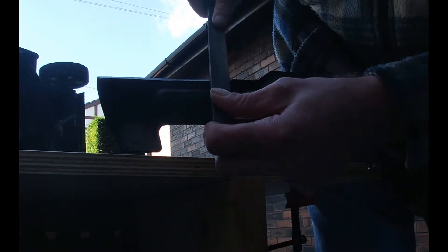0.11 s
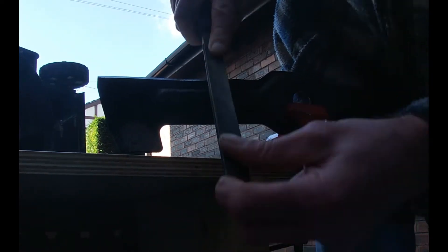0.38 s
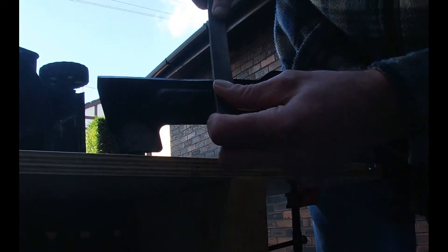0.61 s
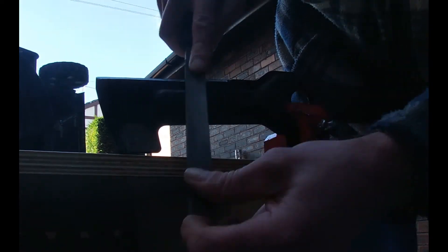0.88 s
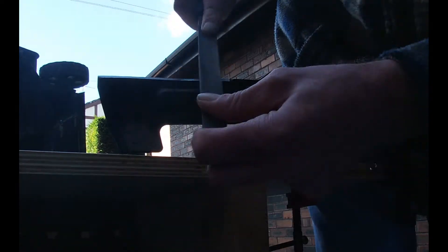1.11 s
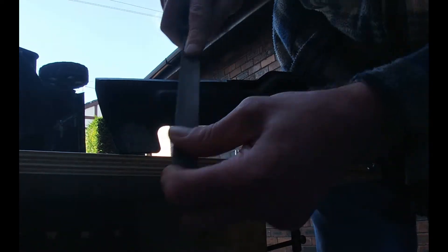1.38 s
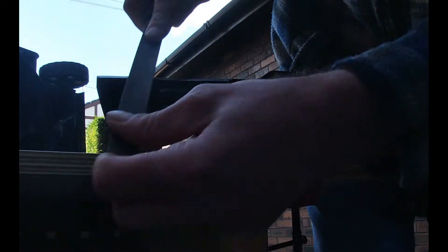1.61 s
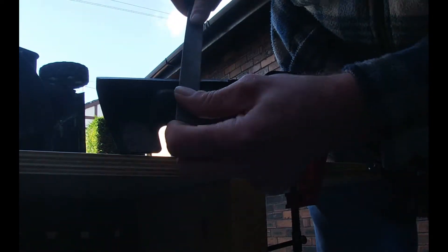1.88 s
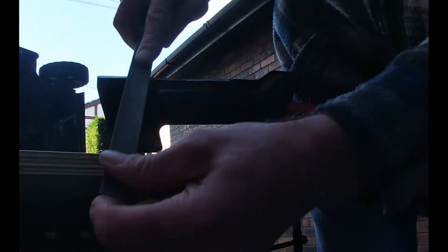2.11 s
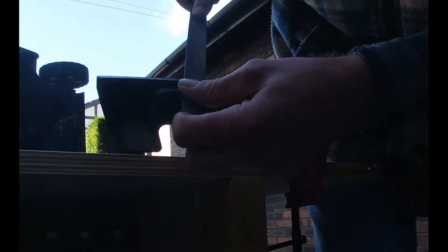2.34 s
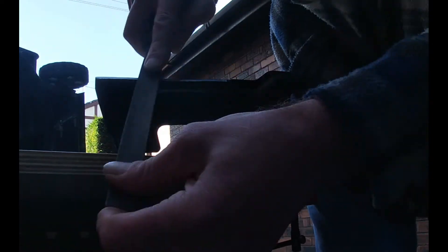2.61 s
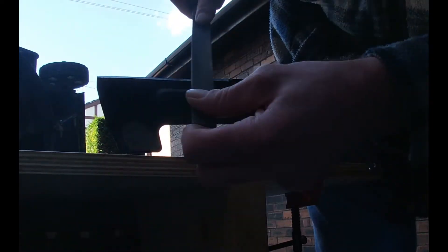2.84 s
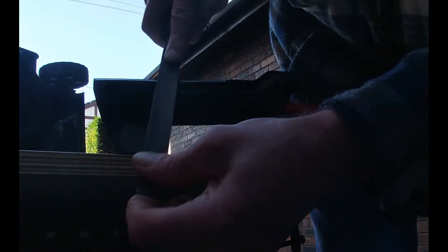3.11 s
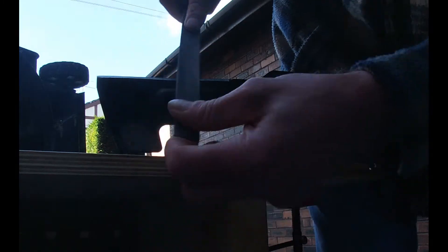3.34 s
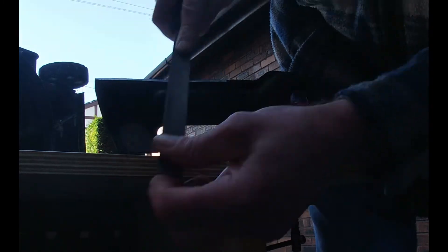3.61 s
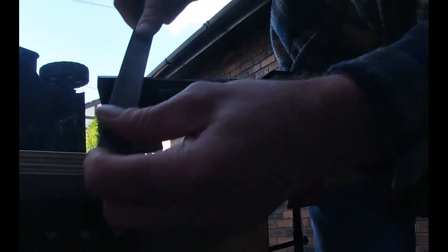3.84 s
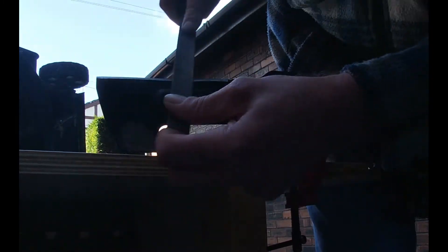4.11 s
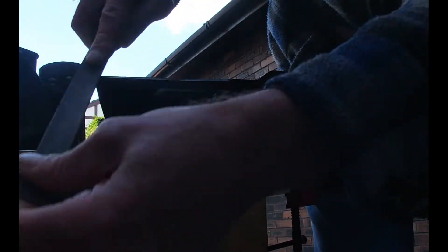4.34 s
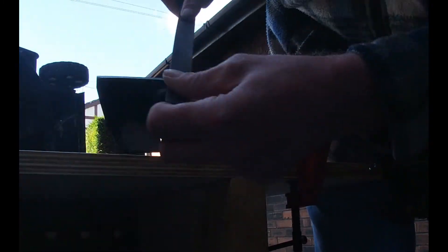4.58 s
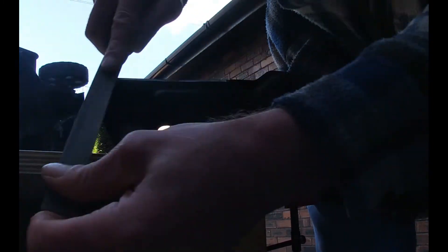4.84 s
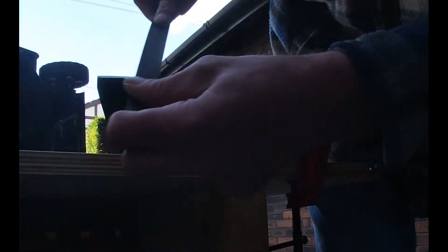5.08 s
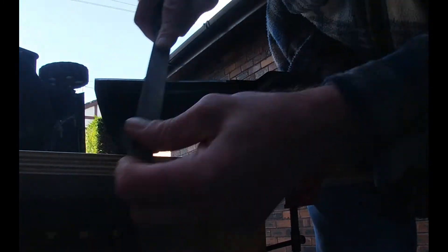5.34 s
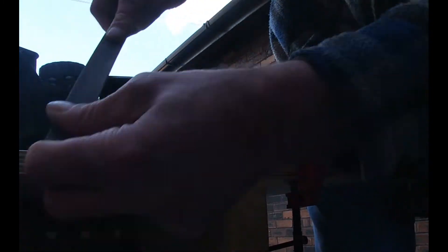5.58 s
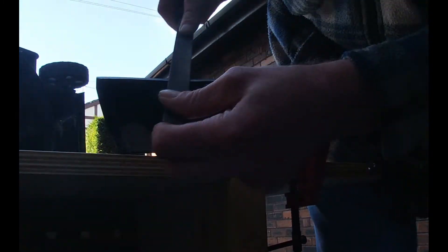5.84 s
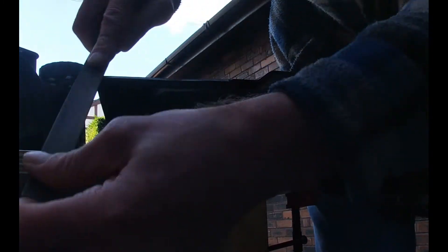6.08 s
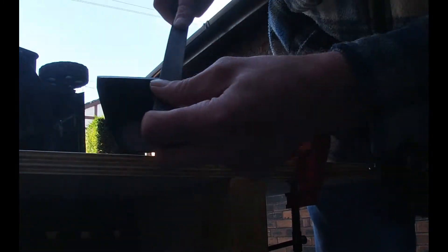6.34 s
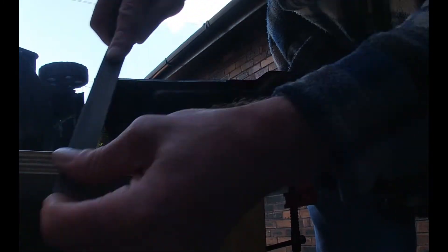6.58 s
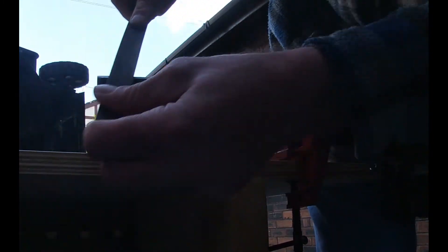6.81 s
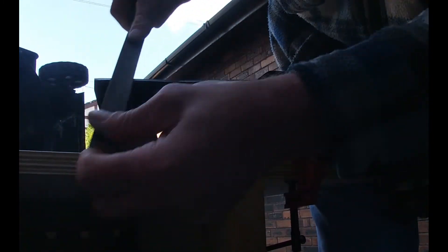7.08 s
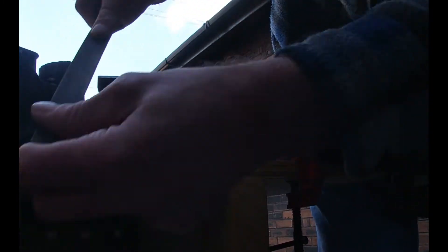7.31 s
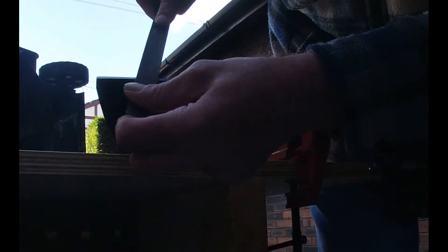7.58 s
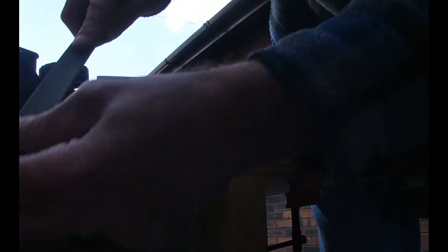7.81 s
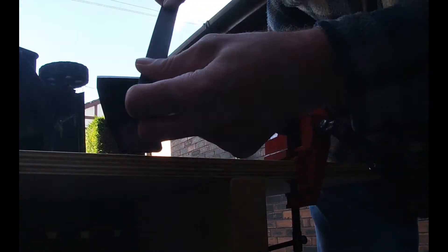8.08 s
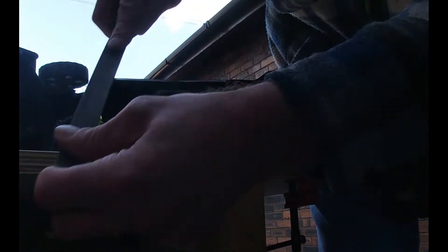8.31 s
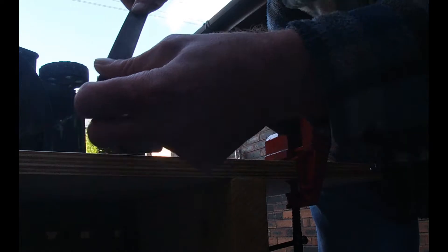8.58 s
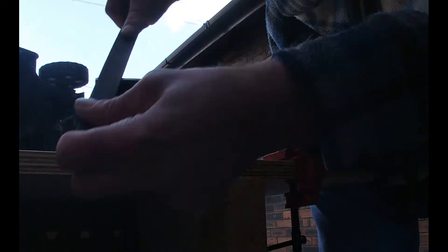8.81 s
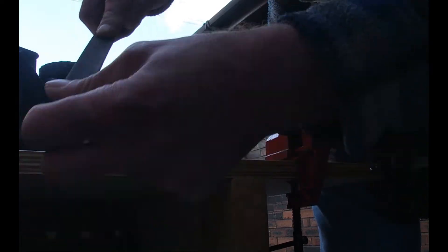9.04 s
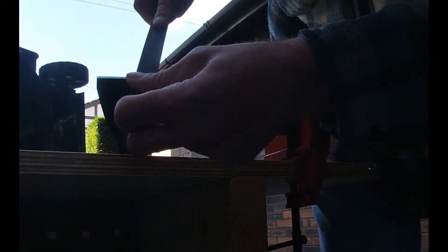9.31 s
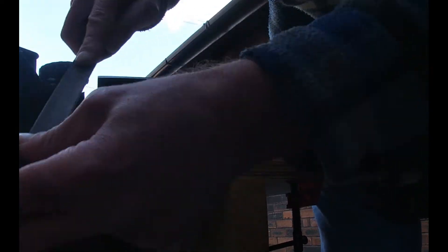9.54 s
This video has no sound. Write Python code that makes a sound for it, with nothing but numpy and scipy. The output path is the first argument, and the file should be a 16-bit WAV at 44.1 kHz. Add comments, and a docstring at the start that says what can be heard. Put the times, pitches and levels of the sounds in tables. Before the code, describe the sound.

Outdoors, close to a bench, a flat hand file strokes a clamped steel blade. The first stroke lands at 0.1 s, and others follow about every 0.57 s until 9.35 s, seventeen in all. Each begins with a dry, bright metallic clack; about a tenth of a second later the teeth bite into a dense, gritty rasp of one or two tenths, ringing hollowly around the low middle, while the wooden bench gives a deep shudder. The rasp drops quickly to a faint hiss as the file returns, with occasional tiny metal ticks. Strokes vary in pitch and force, the rasp growing stronger after about 5.4 s. Short wavering creaks come at 6.3 and 8.1 s, the first with a barely audible thin squeal. Soft air and low wind continue throughout, with puffs near 0, 0.9, 6 and 9.6 s. Highs are dulled, and nearby walls add a short tail.

```python
"""Filing a clamped steel blade

A flat hand file is set down on a clamped steel blade, pushed across it and lifted back, again and again.
It lands with a clack of struck modes, its teeth rasp the steel into ringing as dense uneven clicks,
and the wooden bench shudders and rumbles underneath. Twice something in the clamping creaks in stick-slip
as the file is drawn back. Shaped noise makes the outdoor air and the wind below."""
import sys
import numpy as np
from scipy import signal
from scipy.fft import rfft, irfft
from scipy.io import wavfile

SR = 44100
rng = np.random.default_rng(int(sys.argv[2]) if len(sys.argv) > 2 else 0)


def digitize_waveform(pressure):
    """Quantize a signal to 16-bit integers and store it at the path in sys.argv[1].

    Rows of a 2-D input are taken as channels; values are limited to [-1, 1].
    """
    field = np.atleast_2d(pressure).T
    bounded = np.clip(field, -1, 1)
    quanta = np.round(bounded * 32767).astype(np.int16)
    wavfile.write(sys.argv[1], SR, quanta)


def convert_level_to_amplitude(level_db):
    """Map a level in decibels to its linear amplitude factor."""
    exponent = np.asarray(level_db, float) / 20
    return 10 ** exponent


N = 426888   # length in samples

# The file lands: t/s, blow level/dB, favoured ring f/Hz,
# then tilt of the low/dB, lower middle/dB and upper region/dB
LANDINGS = [(0.119, -16.5, 2660, -15.5, -9, -4.5), (0.7298, -19, 2670, -7.5, -6, 3),
            (1.29, -18, 2650, -13, -5, 2), (1.8603, -22.5, 3380, -5.5, -1.5, 4.5),
            (2.4812, -14.5, 2190, -16.5, -10.5, 0.5), (3.0038, -21.5, 3670, -10, 2.5, 7.5),
            (3.554, -20, 3610, -7.5, -3.5, 4), (4.1396, -19, 3700, -15.5, 2.5, 2),
            (4.7111, -15.5, 4160, -23, -2, 1), (5.2969, -15, 2640, -10.5, -9, 0),
            (5.8585, -16.5, 3940, -8.5, -2.5, 5), (6.4438, -18.5, 5560, -12, -3.5, -0.5),
            (7.0301, -20, 2620, -18, -10, -1.5), (7.6142, -19, 4750, -18.5, -4, -1.5),
            (8.219, -16.5, 2500, -17, -9.5, 1.5), (8.7866, -19, 2550, -12.5, -11, 2.5),
            (9.3489, -18, 5580, -14, -6, -2.5)]
# Modes of blade, file and bench: f/Hz, rasped level/dB, struck level/dB, undamped t60/s
MODES = [(125, -33, -23, 0.04), (182.5, -18, -26.5, 0.44), (208.8, 1.5, -2, 0.34),
         (273.3, -2.5, -27, 0.084), (336, -12, -11, 0.086), (417, -6.5, -20, 0.39),
         (482.1, -10, -12.5, 0.37), (585.4, -6, -11.5, 0.068), (790, -11.5, 4.5, 0.14),
         (878, -30.5, -7, 0.12), (993.6, -3, -22.5, 0.13), (1153, -8.5, -48.5, 0.041),
         (1242, -16, -30, 0.088), (1415, -4, -27, 0.11), (1665, -12, 4.5, 0.071), (1927, -37, -11, 0.074),
         (2060, -36.5, -11.5, 0.4), (2271, -17, -0.5, 0.21), (2500, -19, 6.5, 0.023),
         (2673, -9, -8.5, 0.074), (2821, -14, 1.5, 0.034), (3212, -19, -26.5, 0.11),
         (3584, -16.5, 2, 0.033), (4120, -17, -4.5, 0.081), (4657, -16.5, -2.5, 0.032),
         (5086, -17, -9.5, 0.12), (5490, -12.5, 2, 0.033), (5960, -16, -7, 0.084), (7096, -14, -4.5, 0.079),
         (7740, -14.5, -3, 0.012), (11240, -28, -10, 0.016)]
# The weight of the push shakes the bench, one row a landing: full weight t/s, hold/s, shudder level/dB,
# middle body beside it/dB, swell over the hold before the region's share/dB, creep before the push/dB
SHUDDERS = [(0.231, 0.076, -22, -10.5, 19, -31.5), (0.827, 0.096, -16, -8.5, 4, -28),
            (1.418, 0.12, -17.5, -5, -1.5, -32.5), (1.992, 0.16, -16.7, -5, -7, -32),
            (2.618, 0.075, -18, -2.5, -2.5, -29), (3.115, 0.135, -16.5, -5, -2, -29.5),
            (3.646, 0.14, -19.5, -5, 4, -32), (4.272, 0.11, -18, -5.5, -7.3, -28.5),
            (4.847, 0.13, -22.5, -0.5, -14.5, -28), (5.425, 0.074, -20, 1, -0.5, -27.5),
            (5.982, 0.11, -18, -4, -2, -29), (6.574, 0.13, -19, -4.5, -5.3, -32.5),
            (7.144, 0.12, -15.5, -4.5, 2.5, -33.5), (7.724, 0.096, -17.5, -4.5, 1, -38),
            (8.352, 0.099, -18, -3, -1.8, -31.5), (8.88, 0.11, -16.5, -5, 2, -26.5),
            (9.46, 0.12, -19, -2, -1.2, -32.5)]
# How a push moves in each region (bench, middle, rasp, bright, top): rise/(dB/s), fall/(dB/s),
# creep fade/(dB/s), creep offset/dB, share of the swell/1, arch/dB, drive/dB
STROKE_RULES = [(600, 205.5, 61, 3, 0.96, -0.5, 16.0), (600, 244.5, 62, -10.5, 1.3, 1.5, 13.5),
                (450, 332.5, 54.5, 0, 0.92, -0.5, 23.5), (450, 549, 92.5, -19, 0.99, 2, 27),
                (300, 754, 148.5, -10, 1.6, 6, 20)]

LEAD_S = .025   # length of a faint noise placed before each blow
GRIP_SHIFT, SHIFT_ABOVE_HZ = .022, 1500   # each new grip moves the upper modes by about this share
MIC_EDGE_HZ, MIC_TREBLE_DB = 5680, -11   # the microphone loses sensitivity steeply above this edge


def rms_one(x):
    """Scale to unit power."""
    return x / np.sqrt(np.mean(x ** 2) + 1e-20)


def power_sum(*db):
    """Levels in dB added as power."""
    return 10 * np.log10(sum(convert_level_to_amplitude(2 * d) for d in db) + 1e-20)


def in_time(rows):
    """Table columns as curves, one value a sample."""
    s, *columns = np.transpose(rows)
    return [np.interp(np.arange(N) / SR, s, c) for c in columns]


def at_hz(points, hz):
    """Read a spectrum in dB on a log-frequency axis."""
    points_hz, points_db = np.transpose(points)
    return np.interp(np.log(hz), np.log(points_hz), points_db)


def between(values, centres_hz, hz):
    """Blend per-region values for one frequency."""
    place = np.interp(np.log(hz), np.log(centres_hz), np.arange(len(centres_hz)))
    k = min(int(place), len(centres_hz) - 2)
    return values[k] + (place - k) * (values[k + 1] - values[k])


def drift(rate_hz):
    """Slow random wander of spread 1: noise through two equal low-pass poles, at a fortieth of SR."""
    r = np.exp(-80 * np.pi * rate_hz / SR)
    noise = rng.standard_normal(N // 40 + 2002)
    slow = signal.lfilter([1], [1, -2 * r, r * r], noise)[2000:]   # skip the filter's start
    return np.interp(np.arange(N) / 40, np.arange(len(slow)), rms_one(slow))


def coloured(spectrum):
    """Steady noise with a given spectrum; rms 1."""
    hz = np.maximum(np.arange(N // 2 + 1) * SR / N, 1)
    return rms_one(irfft(rfft(rng.standard_normal(N)) * convert_level_to_amplitude(at_hz(spectrum, hz)), N))


def ring(force, hz, t60):
    """A mode as a two-pole resonator: a unit click sets a sine of height 1 ringing."""
    r, w = convert_level_to_amplitude(-60 / (t60 * SR)), 2 * np.pi * hz / SR
    return signal.lfilter([0, np.sin(w)], [1, -2 * r * np.cos(w), r * r], force + 1e-18)


def ring_by_stroke(force, hz, t60, shifts):
    """A mode rung stroke by stroke, its pitch moved a little by each grip and contact point."""
    out = np.zeros(N + SR)
    cuts = [0] + [round((row[0] - LEAD_S) * SR) for row in LANDINGS] + [N]
    for a, b, shift in zip(cuts, cuts[1:], shifts):
        piece = np.concatenate([force[a:b], np.zeros(SR // 4)])   # room to ring on
        stroke_hz = hz * (1 + GRIP_SHIFT * shift * (hz > SHIFT_ABOVE_HZ))
        out[a:a + len(piece)] += ring(piece, stroke_hz, t60)
    return out[:N]


def pushes(rows, upper, rise, fall, fade, creep_db, share, arch_db):
    """Level in dB: a creep fades after each landing, then the push rises, holds with an arched swell and falls."""
    # how sudden each stroke is, one row a landing: steepness of the bite/1, steepness of the lift/1 (1 = usual)
    suddenness = [(0.92, 1.12), (1.2, 1.3), (0.74, 1), (0.93, 1.44), (0.69, 1.24), (0.9, 1.1), (.9, 1.41),
                  (0.83, 1.46), (.8, 1.1), (0.77, 0.98), (0.49, 0.97), (1.05, 0.84), (0.74, 1.19),
                  (1, 1.53), (0.65, 1.34), (0.66, 1.05), (0.82, 0.99)]
    # the fall slows to this share of the usual rate; at usual steepness from knee_db / (1 - slow_share) down
    knee_db, slow_share = 12, .6
    t, lands = np.arange(N) / SR, np.array(LANDINGS)[:, 0]
    k = np.searchsorted(lands, t) - 1   # latest landing
    full, hold, db, beside_db, swell_db, before_db = np.array(rows)[k].T
    bite, lift = np.array(suddenness)[k].T

    place = np.clip(2 * (t - full) / hold - 1, -1, 1)   # -1 to 1 over the hold
    held_db = db + upper * beside_db + share * swell_db * place / 2 + arch_db * (.5 - place ** 2)
    rising_db = np.minimum(bite * rise * (t - full), 0)
    since = np.maximum(t - full - hold, 0)
    fallen_db = np.minimum(lift * fall * since, knee_db + slow_share * fall * since)
    push_db = held_db + rising_db - fallen_db
    creep = np.where(t < full, before_db + creep_db - fade * (t - lands[k]), -200)
    return np.where(k < 0, -200, power_sum(push_db, creep))   # silent before the first landing


def outdoor_air():
    """Open air as steady coloured noise whose level wanders slightly."""
    air_colour = [(65, -9), (110, 6), (226, 14), (464, 1), (632, -5), (2220, -19.5), (2950, -38),
                  (5590, -33.5), (6590, -61), (11700, -27.5), (15000, -67)]   # air spectrum: f/Hz, relative density/dB
    return convert_level_to_amplitude(-44 + 1.0 * drift(5.4)) * coloured(air_colour)


def wind_and_rumble():
    """One deep noise: wind, puffs on the microphone and the rumble of the pushed bench add as power."""
    wind_rows = [(0.0, -28.5), (0.97, -35.5), (3.29, -33.5), (3.42, -37), (4.34, -36.5), (4.5, -47),
                 (5.93, -35), (6.06, -20), (6.36, -37.5), (7.12, -34), (7.41, -39.5), (8.76, -34),
                 (9.22, -44), (9.68, -34)]   # wind: t/s, level/dB
    wind_colour = [(12, -26.5), (20, 2), (65, -0.5), (130, -17), (170, -17), (290, -120)]   # deep spectrum: f/Hz, relative density/dB
    gusts = [(0.0, -22), (0.84, -16.5), (1.02, -19.5), (2.609, -25), (5.98, -20.5), (6.12, -26),
             (6.95, -23), (9.61, -17)]   # puffs on the microphone: t/s, top level/dB
    rise, fall = 307, 217   # of a puff, dB/s
    t = np.arange(N) / SR
    puffs = [db + np.minimum(rise * (t - s), -fall * (t - s)) for s, db in gusts]
    rumble_db = pushes(SHUDDERS, 0, *STROKE_RULES[0][:-1]) - 20.5   # beside the bench's shudder
    wind_db = in_time(wind_rows)[0] + 1.0 * drift(6.0)
    level_db = power_sum(wind_db, np.max(puffs, axis=0), rumble_db)
    return convert_level_to_amplitude(level_db + 2.0 * drift(9.0)) * coloured(wind_colour)


def creaks():
    """Stick-slip at a wavering rate, mostly its first two partials, and one thin whistle."""
    creak_rows = [
        [(6.31, 403, -64), (6.322, 400, -35), (6.376, 383, -40), (6.408, 396, -29), (6.43, 394.3, -43)],
        [(8.06, 394.2, -33.5), (8.086, 414, -34.5), (8.128, 359, -36), (8.156, 417, -30.5), (8.2, 374, -36)],
    ]   # one list a creak: t/s, pitch f/Hz, level/dB
    partials = [(1, -3.5), (2, -17), (3, -30), (4, -29)]   # partials of a creak: multiple/1, level/dB
    squeal = [(6.31, -93), (6.33, -63), (6.36, -66), (6.39, -80), (6.41, -72), (6.43, -85)]   # thin whistle in the first creak: t/s, level/dB
    out, t = np.zeros(N), np.arange(N) / SR
    for rows in creak_rows:
        hz, db = in_time(rows)
        on = np.clip(np.minimum(t - rows[0][0], rows[-1][0] - t) / 0.014, 0, 1)   # 14 ms fades
        phase = 2 * np.pi * np.cumsum(hz * (1 + 0.025 * drift(60.0))) / SR
        for multiple, partial_db in partials:
            level = convert_level_to_amplitude(db + partial_db + 2.0 * drift(30.0))
            out += np.sqrt(2) * on * level * np.sin(round(multiple) * phase)
    sounding = (t > squeal[0][0]) & (t < squeal[-1][0])
    return out + sounding * convert_level_to_amplitude(in_time(squeal)[0]) * np.sin(2 * np.pi * 4030 * t)


def landings(shifts):
    """A dry crack, and milliseconds of chatter that strike every mode with its own strength."""
    regions_hz = [850, 2100, 3550, 5200]   # centres of the tilt regions: f/Hz
    ticks = [(1.2434, -58.5), (4.647, -46), (5.21, -44.5), (5.7794, -61.5), (7.5724, -46)]   # small touches on the way back: t/s, blow level/dB
    rows, out = np.array(LANDINGS), np.zeros(N)
    blow_db, favoured_hz = rows[:, 1], rows[:, 2]
    at, lead = np.round(rows[:, 0] * SR).astype(int), round(LEAD_S * SR)
    regions = [rows[:, 3] - 4.0, rows[:, 4] - 8.0, 0 * blow_db - 6.0, rows[:, 5] - 8.0]
    t = np.arange(-lead, int(.04 * SR)) / SR   # 0 at the blow
    settling = np.exp(-t / .004)
    for k, (hz, _, struck_db, t60) in enumerate(MODES):
        blows = np.zeros(N)
        # the spot that is struck favours one ring
        favoured_db = 11 * np.exp(-(np.log(hz / favoured_hz) / .05) ** 2)
        chance_db = rng.normal(0, 3.5, len(at))
        blows[at] = convert_level_to_amplitude(blow_db + between(regions, regions_hz, hz) + struck_db + favoured_db + chance_db)
        for s, db in ticks:
            blows[round(s * SR)] = convert_level_to_amplitude(db + struck_db - 21.5) * (hz > SHIFT_ABOVE_HZ)
        # faint noise before the blow, in the modes between these two edges only
        before = convert_level_to_amplitude(-35) * np.exp(t / .011) * (SHIFT_ABOVE_HZ < hz < MIC_EDGE_HZ)
        chatter = rng.standard_normal(len(t)) * np.where(t < 0, before, convert_level_to_amplitude(-14) * settling)
        chatter[lead] = .5   # the first blow
        force = signal.oaconvolve(blows, chatter)[lead:lead + N]
        out += ring_by_stroke(force, hz, 0.54 * t60, shifts[:, k])

    crack = np.zeros(N)
    bursts = rng.standard_normal((len(at), int(.04 * SR))) * np.exp(-t[lead:] / 0.0024)
    for i, db, burst in zip(at, blow_db, bursts):
        crack[i:i + len(burst)] = convert_level_to_amplitude(db - 7.0) * burst
    return out + signal.sosfilt(signal.butter(2, [600, 7000], "band", fs=SR, output="sos"), crack)


def stroke_levels():
    """Region levels in dB over time: the pushes over the faint hiss of the way back."""
    # the teeth bite the steel, one row a landing: full bite t/s, hold/s, rasp level/dB,
    # bright rasp beside it/dB, swell over the hold before the region's share/dB, creep before the bite/dB
    bites = [(0.245, 0.13, -29, 0, 0.5, -44), (0.829, 0.17, -28.5, 3, -2, -33),
             (1.394, 0.18, -30.5, 3, 9.5, -41), (1.987, 0.15, -31, 2.5, -1, -38),
             (2.568, 0.13, -31, 1.5, -6.5, -36.5), (3.123, 0.13, -33.5, 1, -13.5, -38),
             (3.65, 0.16, -28.8, 3.7, 1, -37), (4.226, 0.15, -28.5, 0.6, -8, -38),
             (4.806, 0.144, -30.5, 5, -5.5, -32), (5.4, 0.14, -26, 1.8, -6.9, -35.5),
             (5.958, 0.16, -29.5, 1.9, -7.5, -38.5), (6.557, 0.14, -25.5, 1.7, -2.7, -45.5),
             (7.125, 0.13, -25.5, -1.5, -3.5, -50.5), (7.7, 0.1, -24, -2.5, -3.5, -68.5),
             (8.318, 0.11, -25.5, -2.5, -5, -26), (8.872, 0.137, -26, -8.0, -11.5, -33.5),
             (9.444, 0.1, -24, -3, 7, -45)]
    backdraw = [(.05, -59.5), (.6, -63.5), (1.18, -68), (1.76, -62.5), (2.35, -60), (2.9, -65), (3.46, -71),
                (4.03, -67), (4.59, -62.5), (5.18, -71), (5.75, -66.5), (6.32, -67.5), (6.92, -63),
                (7.5, -67), (8.08, -59), (8.66, -69.5), (9.22, -69.5)]   # faint hiss while the file is carried back: t/s, level/dB
    backdraw_regions_db = [9.5, 4, -2, -1.5, -11.5]   # bench, middle, rasp, bright, top beside it: level/dB
    back_db, = in_time(backdraw)
    tables = [(SHUDDERS, 0), (SHUDDERS, 1), (bites, 0), (bites, 1), (bites, 1)]
    levels = []
    for (rows, upper), (*motion, drive_db), beside_db in zip(tables, STROKE_RULES, backdraw_regions_db):
        push_db = pushes(rows, upper, *motion)
        levels.append(power_sum(push_db, back_db + beside_db) + drive_db)
    return levels


def teeth(per_s, spread_db):
    """Teeth catching on the edge: dense uneven clicks; rms 1."""
    sizes = convert_level_to_amplitude(spread_db * np.minimum(rng.exponential(1, N), 5)) * rng.choice([-1, 1], N)
    return rms_one(sizes * (rng.random(N) < per_s / SR))


def rasp(shifts):
    """Tooth clicks drive modes and a broad scrape; the moving contact favours others from moment to moment."""
    regions_hz = [550, 1050, 2800, 5300, 9000]   # centres of bench, middle, rasp, bright, top: f/Hz
    scrape_body = [(59, -40), (100, -17.5), (284, 0.5), (604, -13.5), (730, -7), (1030, -3.5), (2110, -13),
                   (2680, -24.5), (2970, -22), (6000, -23), (7800, -53), (13200, -120)]   # scrape below its treble: f/Hz, relative density/dB
    scrape_treble = [(6000, -23), (8000, -31), (11000, -34.5), (16000, -40.5)]   # scrape above: f/Hz, relative density/dB
    regions = stroke_levels()
    forces = [teeth(per_s=3500, spread_db=3.6), teeth(per_s=3500, spread_db=3.6)]
    judder = 0.98 * drift(45.0)   # dB; the hand's pressure is uneven
    colour = [point for point in scrape_body if point[0] < scrape_treble[0][0] - 100] + scrape_treble

    out, edges = np.zeros(N), 100 * 2 ** np.arange(0, 7.4, 1 / 4)   # quarter-octave bands
    for k, (low, high) in enumerate(zip(edges, edges[1:])):
        hz = np.sqrt(low * high)
        band = signal.sosfilt(signal.butter(2, [low, high], "band", fs=SR, output="sos"), forces[k % 2])
        flicker = (1.5 if hz < 500 else 3.5) * drift(12.2)
        out += band * convert_level_to_amplitude(between(regions, regions_hz, hz) + at_hz(colour, hz) + judder + flicker)

    for k, (hz, rasped_db, _, t60) in enumerate(MODES):
        flicker = (2.0 if hz < 500 else 4.0) * drift(13.0)
        level_db = between(regions, regions_hz, hz) + rasped_db - 21.5 + judder + flicker
        pressed = .48 * t60   # the pressing file damps the ring
        tone = ring_by_stroke(forces[k % 2] * convert_level_to_amplitude(level_db), hz, pressed, shifts[:, k])
        out += tone / np.sqrt(pressed * SR / 21.8)   # long rings gather more power
    return out


def yard(x):
    """A short diffuse tail from nearby walls: decaying noise of unit energy."""
    t = np.arange(int(.4 * SR)) / SR
    tail = rng.standard_normal(len(t)) * convert_level_to_amplitude(-60 * t / 0.21) * (t > .006)
    tail = signal.sosfilt(signal.butter(1, 4500, fs=SR, output="sos"), tail)   # duller than the direct sound
    return signal.oaconvolve(x, tail / np.sqrt(np.sum(tail ** 2)))[:N]


def scene():
    """Work, walls, wind and air."""
    shifts = rng.standard_normal((len(LANDINGS) + 1, len(MODES)))   # first row: before any landing
    work = rasp(shifts) + landings(shifts) + creaks()
    return (work + convert_level_to_amplitude(-11) * yard(work) + wind_and_rumble() + outdoor_air())[None]


def top_cut(x):
    """Nothing passes above the cut-off."""
    return signal.sosfilt(signal.butter(12, 15660, fs=SR, output="sos"), x)


def record(dry):
    """A dull microphone with no deep bass; peaks are rounded a little."""
    body = signal.sosfilt(signal.butter(8, MIC_EDGE_HZ, fs=SR, output="sos"), dry)
    treble = signal.sosfilt(signal.butter(8, MIC_EDGE_HZ, "high", fs=SR, output="sos"), dry)
    dulled = body + convert_level_to_amplitude(MIC_TREBLE_DB) * treble
    heard = signal.sosfilt(signal.butter(2, 45, "high", fs=SR, output="sos"), dulled)
    mix = 0.76 * np.tanh(heard / 0.89)
    return top_cut(mix)


dry = scene()
out = record(dry)
digitize_waveform(out)
```